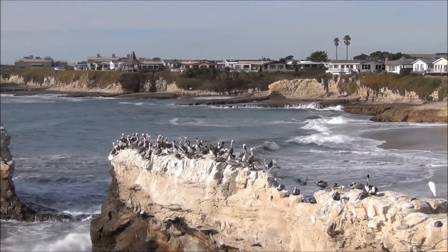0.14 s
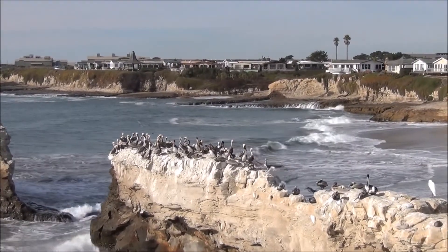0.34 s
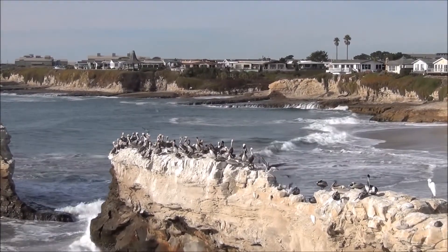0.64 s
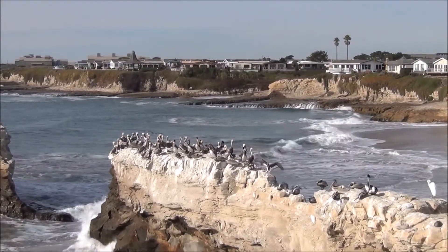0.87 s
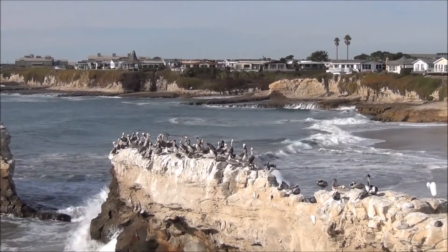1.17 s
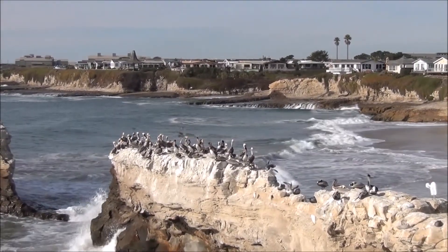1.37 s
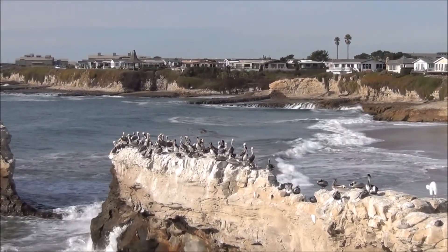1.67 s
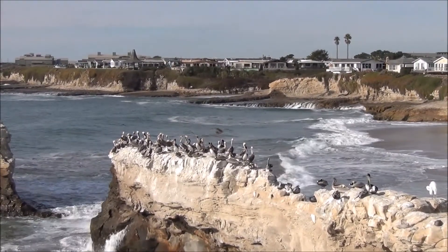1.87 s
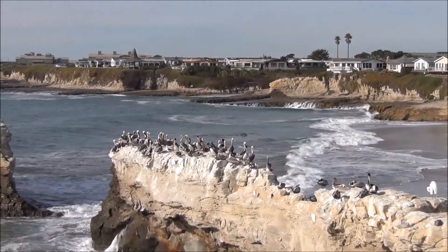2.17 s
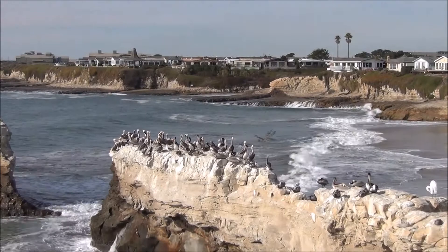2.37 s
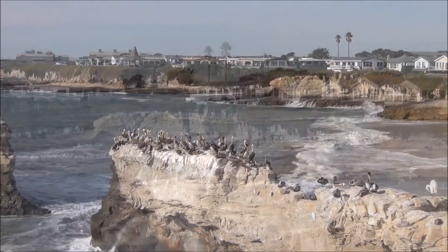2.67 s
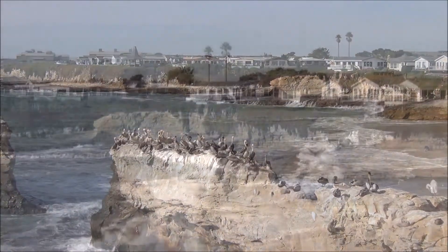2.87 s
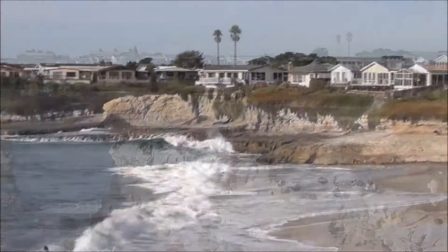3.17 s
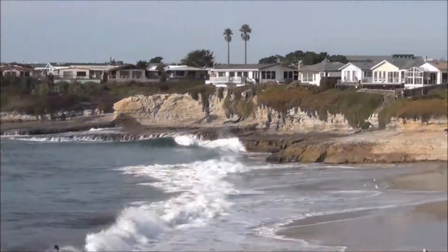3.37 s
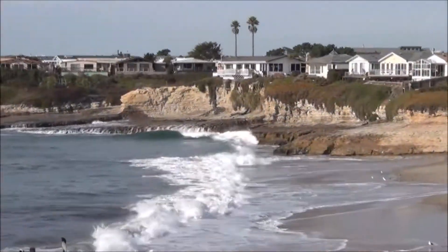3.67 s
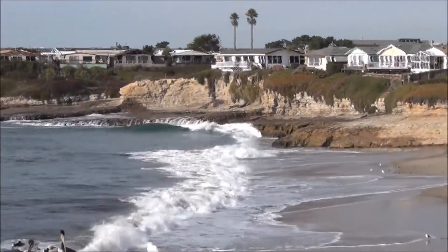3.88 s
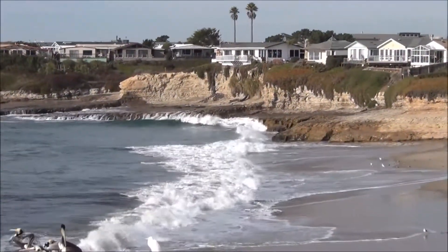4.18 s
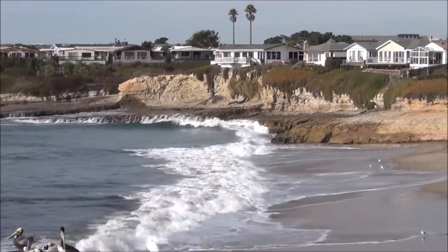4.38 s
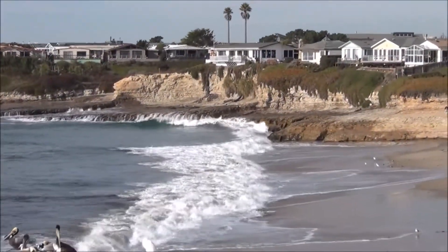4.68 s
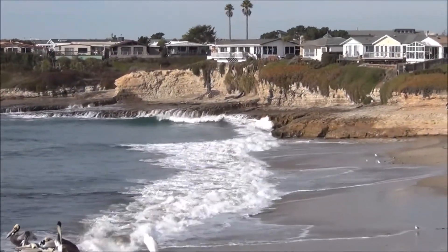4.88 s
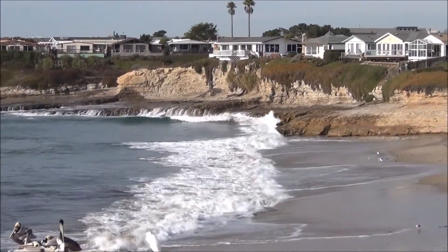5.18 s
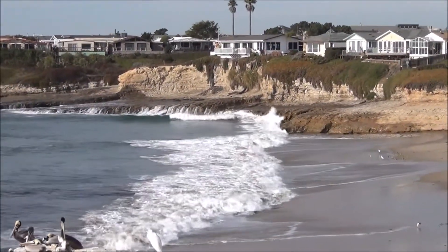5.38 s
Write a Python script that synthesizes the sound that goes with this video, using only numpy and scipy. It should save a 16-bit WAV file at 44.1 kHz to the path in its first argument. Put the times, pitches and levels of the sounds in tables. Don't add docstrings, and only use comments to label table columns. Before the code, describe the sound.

Surf bursts on rocks in a broad foamy rush, drains to a near-quiet lull, then another wave splashes and heaps up on the left.

```python
import sys
import numpy as np
from scipy import signal
from scipy.io import wavfile
from scipy.ndimage import uniform_filter1d

SR = 44100
rng = np.random.default_rng(int(sys.argv[2]) if len(sys.argv) > 2 else 0)


def waveform_to_disk(signal):
    frames = np.transpose(np.atleast_2d(signal))
    scaled = np.clip(frames, -1, 1) * 32767
    samples = np.round(scaled).astype(np.int16)
    wavfile.write(sys.argv[1], SR, samples)


def level_to_linear(level):
    exponent = np.asarray(level, float) / 20
    return 10 ** exponent


N = 244314
FRAME, HOP = 1024, 256
DRAINED_S, LANDS_S = 3.3, 3.94


def evened(x):
    return x / np.sqrt(np.mean(x ** 2) + 1e-20)


def read(points, hz):
    f, value = np.transpose(points)
    return np.interp(np.log(hz + 1), np.log(f + 1), value)


def add(mix, s, sound):
    part = mix[round(s * SR):][:len(sound)]
    part += sound[:len(part)]


def blotches(shape, bins, frames):
    field = rng.standard_normal(shape)
    for _ in range(2):
        field = uniform_filter1d(field, size=bins, axis=0)
        field = uniform_filter1d(field, size=frames, axis=1)
    return evened(field)


def bumps(t, events, seconds):
    return sum(db * np.exp(-((t - s) / seconds) ** 2) for s, db in events)


def trailing(db, seconds):
    keep = np.exp(-HOP / SR / seconds)
    return signal.lfilter([1 - keep], [1, -keep], db - db[0]) + db[0]


def blend(rock, beach, hz, sand):
    return np.outer(read(rock, hz), 1 - sand) + np.outer(read(beach, hz), sand)


def whine_level_db(t):
    # t/s, level/dB
    levels = [(0, -59), (1.2, -65), (2.93, -77), (4.07, -64), (5.54, -62.5)]
    return np.interp(t, *np.transpose(levels))


def preamp_hiss(t):
    hiss_db = -56 + 0.3 * (whine_level_db(t) + 70)
    common, separate = rng.standard_normal(N), rng.standard_normal((2, N))
    return level_to_linear(hiss_db) * (common + 0.61 * separate)


def scan_whine(t):
    # f/Hz, level/dB
    lines = [
        (15734.3, 0.),
        (15674.4, -10.5),
        (15614.5, -13.),
        (15794.2, -12.),
    ]
    tones = sum(np.sqrt(2) * level_to_linear(db) * np.sin(2 * np.pi * hz * t) for hz, db in lines)
    return level_to_linear(whine_level_db(t)) * tones


def slaps():
    # t/s, peak/dB, f/Hz, length/cycles
    slap_events = [(1.3, -23, 243, 5.9), (1.748, -24, 450, 0.92), (2.53, -36, 450, 1.3),
                   (4.475, -29, 277, 1.2), (4.487, -27, 260, 1.5), (4.501, -19, 337, 0.92)]
    out = np.zeros(N)
    for s, db, hz, cycles in slap_events:
        u = np.arange(-3, 3, hz / SR)
        bell = np.exp(-(u / (0.44 * cycles)) ** 2)
        add(out, s - 2.74 / hz, -level_to_linear(db) * np.cos(2 * np.pi * u) * bell)
    return out


def splashes():
    # t/s, peak/dB, f/Hz, length/s
    spray_events = [(3.967, -26, 2570, 0.003), (3.988, -22, 2100, 0.002), (3.997, -19.5, 2700, 0.003),
                    (4.084, -24, 1700, 0.001), (4.123, -24, 2300, 0.008), (4.975, -16, 2400, 0.012)]
    out, t = np.zeros(N), np.arange(2600) / SR
    for s, db, hz, length in spray_events:
        hits = rng.standard_normal(len(t)) * (rng.random(len(t)) < .2)
        drops = hits * t / length * np.exp(1 - t / length)
        bubble = np.sin(2 * np.pi * hz * t * (1 + 20.0 * t)) * t * np.exp(-t * hz / 0.45)
        clump = signal.fftconvolve(drops, bubble)[:len(t)]
        add(out, s - length, level_to_linear(db) * clump / abs(clump).max())
    return out


def strengths(t):
    # t/s, level/dB
    rush = [(0, -20), (.36, -20.5), (.57, -16.5), (1.0, -18), (1.45, -19.5), (1.65, -22.5), (2.0, -23.5),
            (2.18, -26), (2.42, -26), (2.62, -30.5), (3.1, -37), (3.4, -43), (3.91, -40.5), (3.97, -32.5),
            (4.2, -31), (4.68, -28.5), (4.95, -22.5), (5.54, -23)]
    # t/s, rise/dB
    surges = [(.585, 1), (.92, 1.5), (1.42, 0), (1.96, 0.5), (2.85, 1), (3.2, 0), (3.99, 3), (4.125, 2),
              (4.78, 2), (4.98, 0.5), (5.15, 0.5), (5.4, 2)]
    # t/s, rise/dB
    gusts = [(.13, 7), (.46, 0.5), (.68, 2), (1.03, 7), (1.3, 11), (1.74, 7), (2.1, -1), (2.33, 2),
             (2.47, 6), (2.65, -11), (2.95, 12), (3.1, 6), (3.62, 4), (4.03, -10), (4.25, 8), (4.49, 13),
             (4.68, 11), (4.81, 9)]
    stages = [
        (-5.5, -5, -28.5, 1.86),
        (-3.5, -7.5, -19, 3),
        (-8.5, -5.5, -29, 5.5),
    ]
    rush_db = np.interp(t, *np.transpose(rush)) + bumps(t, surges, 0.025)
    drained = np.clip((t - DRAINED_S) / 0.18 + .5, 0, 1)
    landed = np.clip((t - LANDS_S) / 0.036 + .5, 0, 1)
    boom_db, fizz_db, rumble_db, pan_db = np.transpose(stages) @ [1 - drained, drained - landed, landed]
    boom_db = boom_db + bumps(t, [(0.77, 2.6)], 0.28)
    heap_s, heavy = 0.19, 0.93
    boom_db = boom_db + landed * heavy * (trailing(rush_db, heap_s) - rush_db)
    foam_s, linger = 0.23, 0.51
    fizz_db = fizz_db + (1 - drained) * linger * (trailing(rush_db, foam_s) - rush_db)
    steady_db = np.where(drained > landed, rush_db, -25 + 0.84 * (rush_db + 24.5))
    rumble_db = rumble_db + steady_db + bumps(t, gusts, 0.051)
    return rush_db, boom_db, fizz_db, rumble_db, pan_db


def foam_spectrum_db(hz, sand, notch_db, rush_db, boom_db, fizz_db, rumble_db):
    # f/Hz, level/(dB per Hz)
    rock_wave = [(18, -69), (30, -42), (237, -14), (379, -10), (455, -4), (575, -1), (1080, -4.5),
                 (1330, -3), (1720, -6), (2990, -7), (5450, -15), (7860, -5), (8500, -8), (11600, -32.5),
                 (15500, -43.5)]
    sand_wave = [(18, -61), (30, -25), (148, -14), (182, -15), (263, -0.5), (420, 0), (467, 1.5),
                 (1360, -4), (1870, -2.5), (3780, -7), (5040, -13.5), (6540, -10), (7860, -4), (11300, -33),
                 (15500, -30)]
    colour_db = blend(rock_wave, sand_wave, hz, sand)

    def band_db(lo, hi):
        return 10 * np.log10((level_to_linear(colour_db[(hz > lo) & (hz < hi)]) ** 2).sum(0))

    deep = read([(150, 0.91), (260, 0.018)], hz)
    low = read([(500, 1.), (1100, 0.056)], hz) - deep
    high = read([(3000, 0.035), (6000, 1.)], hz)
    body_db = band_db(800, 4000)
    field_db = colour_db + rush_db - body_db
    field_db += np.outer(low, boom_db - band_db(200, 800) + body_db)
    field_db += np.outer(deep, rumble_db - rush_db - band_db(40, 200) + body_db)
    field_db += np.outer(high, fizz_db - band_db(5500, 10000) + body_db)
    field_db -= np.outer(np.exp(-((hz - 5080) / 260) ** 2), notch_db)
    return field_db


def foam_flicker_db(hz, frames):
    flicker_db = 0.46 * blotches((len(hz), frames), bins=14, frames=9)
    # f/Hz, rms/dB; length/frames
    for depth, length in [([(1000, 0.076), (4000, 0.3), (12000, 0.32)], 4),
                          ([(1000, 0.44), (3000, 0.42)], 14),
                          ([(100, 0.88), (300, 0.44)], 6)]:
        flicker_db += np.outer(read(depth, hz), blotches((1, frames), bins=1, frames=length))
    return flicker_db


def two_ports(hz, sand, pan_db):
    # f/Hz, likeness/(0-1)
    rock_same = [(60, 0.57), (130, 0.91), (290, 1), (640, 1), (1410, 0.99), (3100, 0.95), (6820, 0.95),
                 (15000, 1)]
    sand_same = [(60, 0.14), (130, 0.47), (290, 0.99), (640, 1), (1410, 1), (3100, 0.94), (6820, 0.82),
                 (15000, 0.19)]
    # f/Hz, phase/rad
    rock_lead = [(0, 0.3), (5340, -0.034), (7240, -0.4), (9220, -0.43), (15200, 0.2)]
    sand_lead = [(0, 0.56), (5860, 0.56), (6200, -1.5), (6890, -2.35), (8530, 1), (9130, -1.9),
                 (10800, 0.21), (15200, 0.0)]
    # f/Hz, level/dB
    rock_lean = [(60, -1), (130, 3.5), (290, 0.5), (640, 1.8), (1410, 0.5), (3100, 1.5), (6820, 2.2),
                 (15000, -5.5)]
    sand_lean = [(60, 3.0), (130, 4.5), (290, 4.9), (640, 4.9), (1410, 5.3), (3100, 7.7), (6820, 5.8),
                 (15000, 0.62)]
    a, b, c, d = rng.standard_normal((len(sand), len(hz), 4)).T
    left, other = a + 1j * b, c + 1j * d
    same = np.clip(blend(rock_same, sand_same, hz, sand), -1, 1)
    same *= np.clip(read([(40, .1), (150, 1.)], hz), 0, 1)[:, None]
    right = same * left + np.sqrt(1 - same ** 2) * other
    right = right * np.exp(-1j * blend(rock_lead, sand_lead, hz, sand))
    lean_db = blend(rock_lean, sand_lean, hz, sand)
    lean_db += pan_db - lean_db[(hz > 400) & (hz < 8000)].mean(0)
    return np.array([left * level_to_linear(lean_db / 2), right * level_to_linear(-lean_db / 2)])


def surf():
    # t/s, sand wave share/(0-1), housing notch depth/dB
    handover = [(2.6, 0., -2), (3.3, 0.42, -1), (3.9, 0.53, 1), (3.96, 1., 1), (4.62, 0.93, 9),
                (4.8, 0.63, 1)]
    hz, t = np.fft.rfftfreq(FRAME, 1 / SR), np.arange(N // HOP + 5) * HOP / SR
    s, share, notch_db = np.transpose(handover)
    sand, notch_db = np.clip(np.interp(t, s, share), 0, 1), np.interp(t, s, notch_db)
    *band_levels_db, pan_db = strengths(t)
    field_db = foam_spectrum_db(hz, sand, notch_db, *band_levels_db) + foam_flicker_db(hz, len(t))
    z = two_ports(hz, sand, pan_db) * level_to_linear(field_db + 2.0)
    return signal.istft(z, nperseg=FRAME, noverlap=FRAME - HOP)[1][:, :N]


def scene():
    left_right_db = np.array([[2.2], [-2.5]])
    return surf() + (slaps() + splashes()) * level_to_linear(left_right_db)


def thinned(x, share):
    patches = blotches(share.shape, bins=3, frames=6)
    rank = np.argsort(np.argsort(patches, axis=None)).reshape(share.shape) / share.size
    return x * (rank > share) / np.sqrt(np.maximum(1 - share, .3))


def starved(x):
    # f/Hz, share/(0-1)
    width_dropped = [(60, .5), (250, .45), (550, .2), (1250, .8), (1900, .25), (3100, .5), (7000, .25),
                     (8200, .35), (8900, 1)]
    top_dropped = [(9300, 0), (11000, .48), (15600, .55), (15680, 0)]
    hz, t, (left, right) = signal.stft(x, SR, nperseg=FRAME, noverlap=FRAME - HOP)
    narrow = np.interp(t, [DRAINED_S - .4, DRAINED_S + .1, LANDS_S, LANDS_S + .01], [1, .4, .4, 0])
    narrow = np.where((hz[:, None] > 8900) & (t < LANDS_S), 1, narrow)
    mid = (left + right) / 2
    side = thinned((left - right) / 2, read(width_dropped, hz)[:, None] * narrow)
    both = thinned(np.array([mid + side, mid - side]), np.outer(read(top_dropped, hz), t > LANDS_S))
    return signal.istft(both, SR, nperseg=FRAME, noverlap=FRAME - HOP)[1][:, :N]


def band_limit(x):
    return signal.sosfilt(signal.butter(12, 15800, fs=SR, output="sos"), x)


def record(dry):
    t = np.arange(N) / SR
    low_cut = signal.butter(2, 55., "high", fs=SR, output="sos")
    cut = signal.sosfilt(low_cut, dry + preamp_hiss(t))
    overloaded = 1.433 * np.tanh(cut / 1.358)
    return band_limit(starved(overloaded) + scan_whine(t))


dry = scene()
out = record(dry)
waveform_to_disk(out)
```